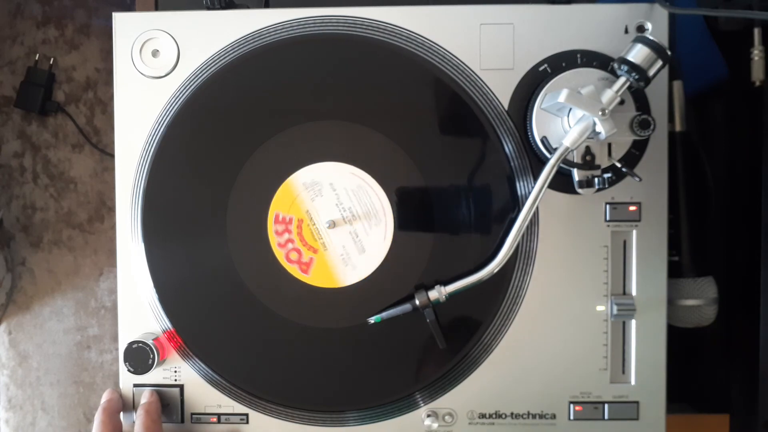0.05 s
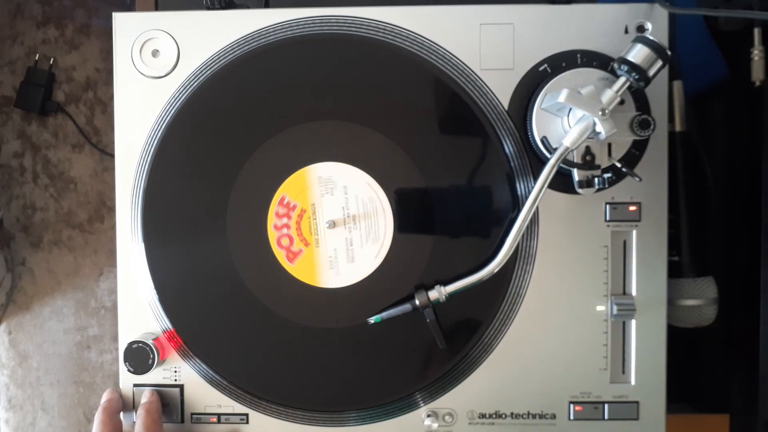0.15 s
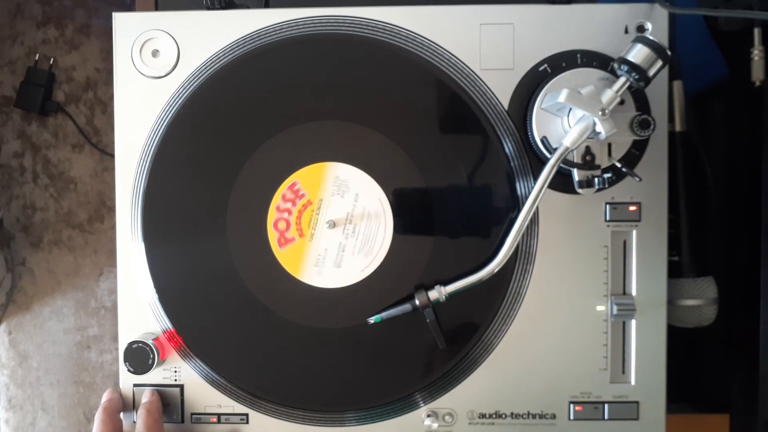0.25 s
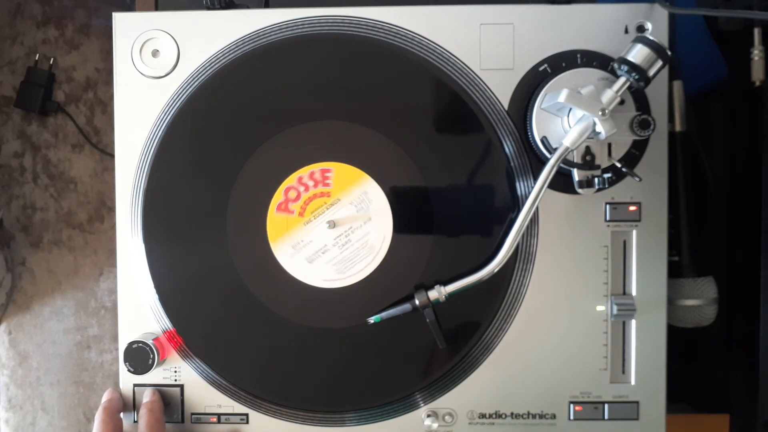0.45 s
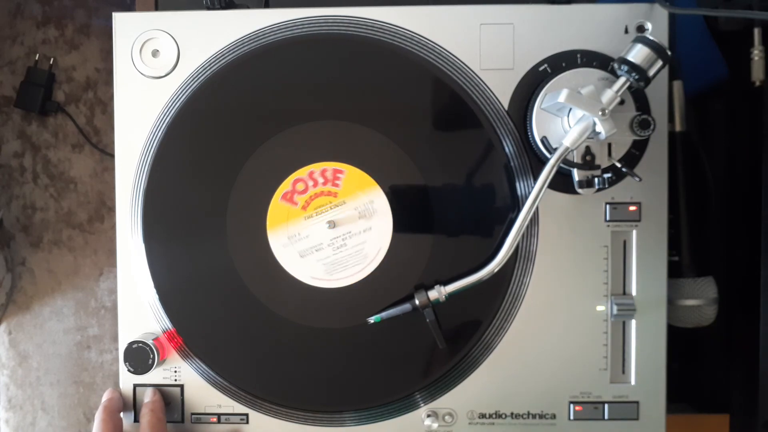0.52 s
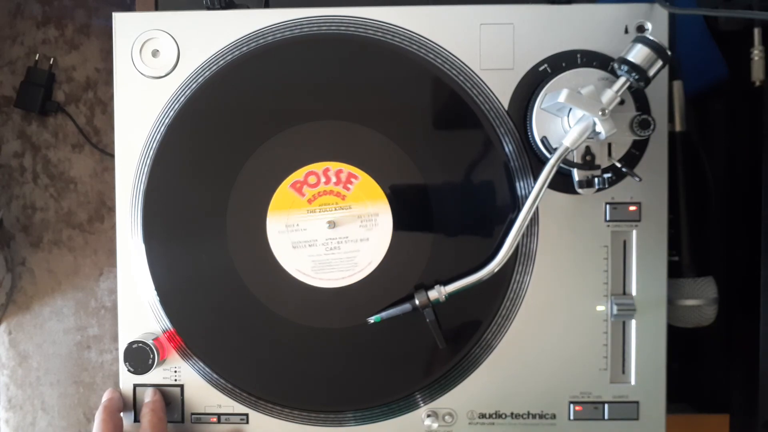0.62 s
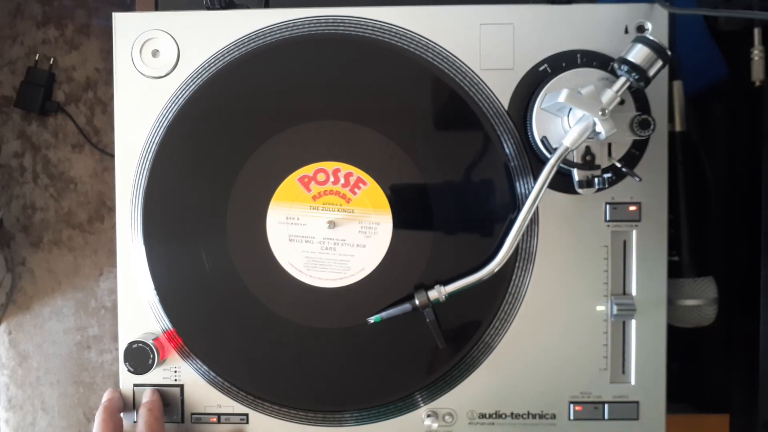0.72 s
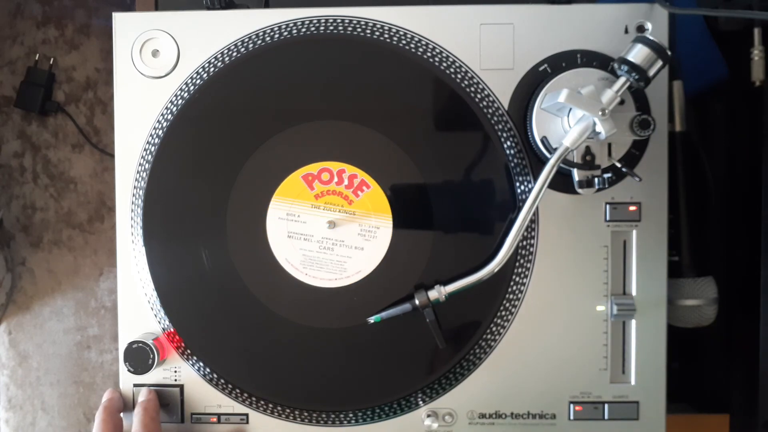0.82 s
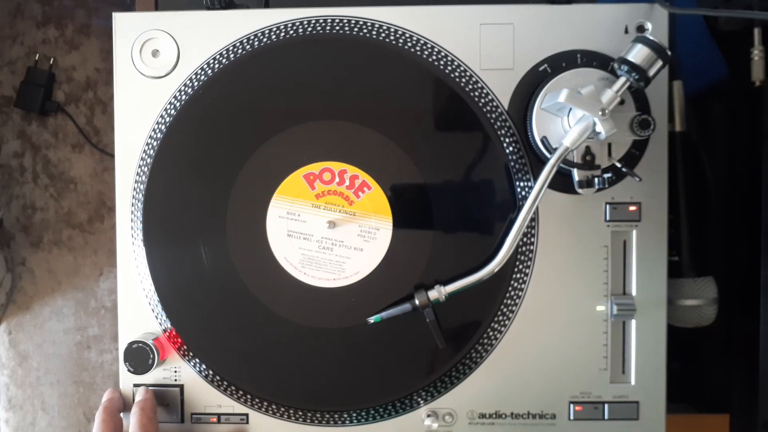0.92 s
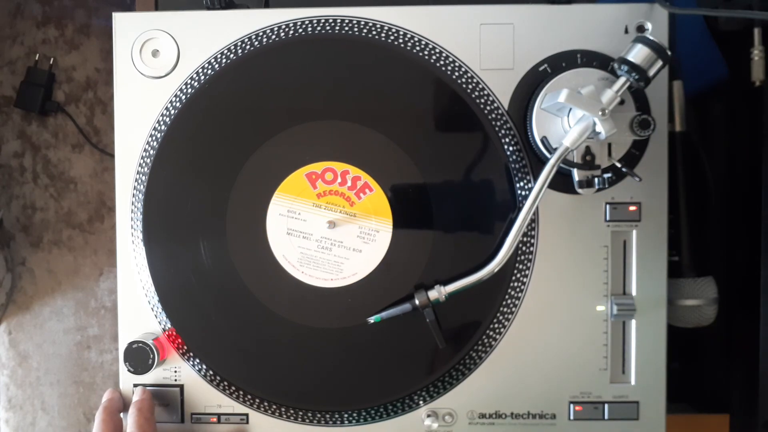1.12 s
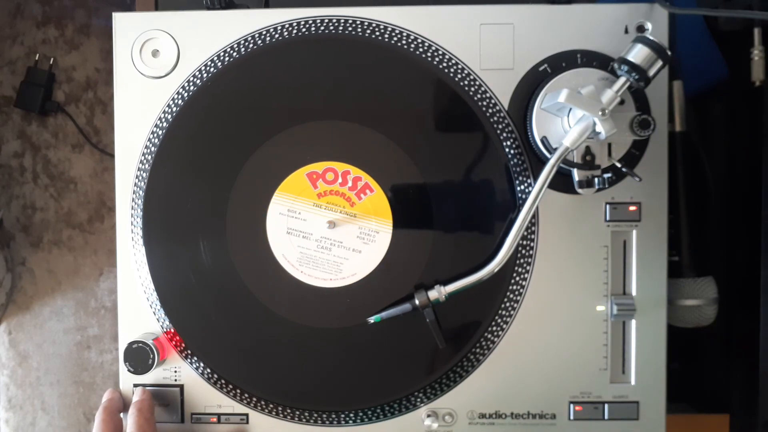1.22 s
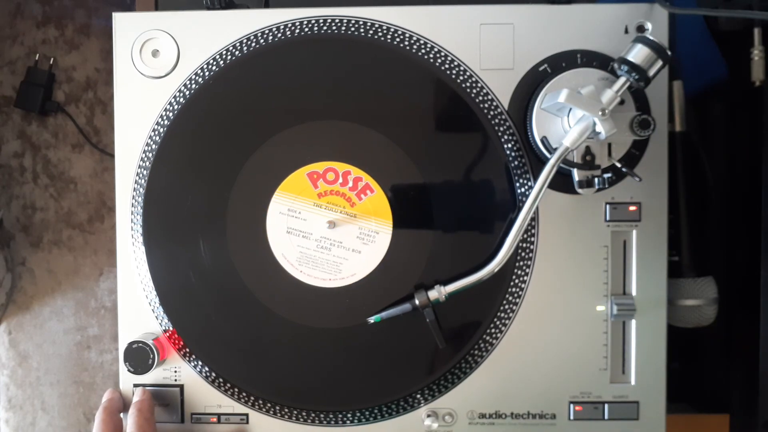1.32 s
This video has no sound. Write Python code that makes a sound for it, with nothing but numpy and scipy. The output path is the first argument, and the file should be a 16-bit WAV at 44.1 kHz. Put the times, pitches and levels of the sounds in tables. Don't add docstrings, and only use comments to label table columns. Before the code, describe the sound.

Vinyl surface noise on a turntable: dense crackle, sharp pops and low bumps while the record brakes, then a soft thud as it stops and a low hum dying over faint hiss, direct from the cartridge, no room.

```python
import sys
import numpy as np
from scipy import signal
from scipy.fft import rfft, irfft
from scipy.io import wavfile
from scipy.ndimage import uniform_filter1d

SR = 44100
rng = np.random.default_rng(int(sys.argv[2]) if len(sys.argv) > 2 else 0)


def log_audio(samples):
    frames = np.atleast_2d(samples).T
    limited = np.clip(frames, -1, 1)
    pcm = np.round(limited * 32767).astype(np.int16)
    wavfile.write(sys.argv[1], SR, pcm)


def decibels_to_gain(level_db):
    exponent = np.asarray(level_db, float) / 20
    return 10 ** exponent


N = 59535
BRAKE_S = 0.8397
SAG_S, JOLT_RISE_S = 0.015, 0.0022


def evened(x):
    return x / np.sqrt(np.mean(x ** 2) + 1e-20)


def curve(points):
    s, value = np.transpose(points)
    return np.interp(np.arange(N) / SR, s, value)


def coloured(spectrum):
    f, db = np.transpose(spectrum)
    hz = np.fft.rfftfreq(N, 1 / SR)
    gain = decibels_to_gain(np.interp(np.log(hz + 1), np.log(f + 1), db))
    return evened(irfft(rfft(rng.standard_normal(N)) * gain, N))


def wander(seconds):
    size = max(int(seconds * SR), 1)
    once = uniform_filter1d(rng.standard_normal(N), size)
    return evened(uniform_filter1d(once, size))


def resonate(x, hz, width_hz):
    turn = np.exp(2j * np.pi * hz * np.arange(len(x)) / SR)
    r = np.exp(-np.pi * width_hz / SR)
    return 2 * (turn * signal.lfilter([1 - r], [1, -r], x / turn + 1e-18)).real


def add(mix, s, sound):
    part = mix[max(round(s * SR), 0):][:len(sound)]
    part += sound[:len(part)]


def hiss():
    # f/Hz, density/dB
    hiss_spectrum = [(130, -32), (220, -1), (327, -28), (1540, -19.5), (1650, -22), (1780, -24),
                     (15100, -29.5), (16300, -46)]
    return decibels_to_gain(-59) * coloured(hiss_spectrum)


def pop(hz, fizz_db, grit):
    blunt, spring_hz = 0.8, 416
    chip_db, chip_span_s = -12, (-0.0025, 0.0006)
    fizz_band_hz, fizz_s, fizz_lead_s, fizz_trim_db = (1500, 8000), 0.0004, 0.0004, -1
    t = (np.arange(len(grit)) - 128) / SR
    chip_at_s = np.interp(np.sin(9 * grit[:4]), (-1, 1), chip_span_s)[:, None]
    chip_size = decibels_to_gain(chip_db) * np.tanh(grit[4:8])
    chips = 1 / (1 + (2 * np.pi * hz * (t - chip_at_s)) ** 2) ** 2
    dip = -1 / (1 + (2 * np.pi * blunt * hz * t) ** 2) ** 2
    dip = dip + chip_size @ chips
    dip = signal.lfilter(*signal.butter(1, spring_hz, "high", fs=SR), dip)
    burst = grit * np.exp(-abs(t + fizz_lead_s) / fizz_s)
    fizz = signal.lfilter(*signal.butter(1, fizz_band_hz, "band", fs=SR), burst)
    return dip / abs(dip).max() + decibels_to_gain(fizz_db + fizz_trim_db) * fizz / abs(fizz).max()


def fine_crackle():
    per_s, spread_db = 1200, 4.5
    hit = rng.random(N) < per_s / SR
    size = hit * decibels_to_gain(spread_db * np.minimum(rng.exponential(1, N), 3))
    sign = np.where(rng.random(N) < 0.7, 1, -1)
    kind = rng.integers(0, 24, N)
    sharp_hz = np.geomspace(830, 5970, num=24)
    fizz_db = rng.uniform(-14, 0, 24)
    out = np.zeros(N)
    for k, hz in enumerate(sharp_hz):
        speck = pop(hz, fizz_db[k], rng.standard_normal(256))
        out += signal.oaconvolve(size * sign * (kind == k), speck)[:N]
    return evened(out)


def scrape():
    # f/Hz, density/dB
    scrape_spectrum = [(180, -41), (300, -32), (433, 1), (528, -1.5), (3350, -15), (3760, -16.5),
                       (16000, -27)]
    flicker_db = 2.5 * wander(0.002) + 1.2 * wander(0.015)
    return evened(coloured(scrape_spectrum) * decibels_to_gain(flicker_db))


def groove():
    # t/s, level/dB
    friction = [(0, -40.5), (.06, -39.5), (.12, -40), (.16, -43), (.21, -40), (.285, -42), (.35, -36.5),
                (.45, -42.5), (.52, -35.5), (.62, -43.5), (.66, -47.5), (.72, -49.5), (.77, -45),
                (.81, -49), (.84, -51), (1.1, -56.5), (1.2, -60.5)]
    still_db = np.interp(np.arange(N) / SR, (BRAKE_S - 0.03, BRAKE_S), (0, -12))
    crackle = decibels_to_gain(-1.5 + still_db) * fine_crackle()
    return decibels_to_gain(curve(friction)) * (crackle + decibels_to_gain(-2.5) * scrape())


def arm():
    # f/Hz, width/Hz, level/dB
    arm_modes = [(62, 25, -6.5), (550, 120, -17), (110, 45, -1.5), (175, 45, -1.5), (260, 70, -4)]
    # t/s, level/dB
    tremble = [(0.0, -30), (0.134, -35), (0.36, -28.5), (0.466, -28.5), (0.646, -37.5), (0.788, -31),
               (0.916, -53.5), (1.056, -55), (1.35, -60)]
    lumpy_db = 4 * wander(0.0061)
    shake = rng.standard_normal(N) * decibels_to_gain(lumpy_db)
    body = np.zeros(N)
    for hz, width_hz, db in arm_modes:
        mode = resonate(resonate(shake, hz, width_hz), hz, width_hz)
        body += decibels_to_gain(db) * evened(mode)
    return decibels_to_gain(curve(tremble)) * evened(body)


def pops():
    # t/s, level/dB, sharpness f/Hz, fizz re level/dB
    pops_early = [(0.0107, -15, 1710.0, -15), (0.016, -23, 1860.0, -7), (0.0293, -21, 1350.0, -8),
                  (0.0338, -14, 1310.0, -10), (0.0646, -21, 1130.0, -15), (0.0667, -21, 960.0, -16),
                  (0.1062, -23, 2280.0, -12), (0.1164, -24, 2110.0, -4), (0.1205, -16, 2170.0, -8),
                  (0.1265, -23, 1220.0, -20), (0.1409, -21, 2490.0, -9), (0.1803, -24, 2090.0, -10),
                  (0.2003, -23, 3830.0, -8), (0.2228, -15, 1550.0, -7), (0.2271, -16, 1280.0, -13),
                  (0.2299, -7, 2140.0, -17), (0.2386, -10, 2320.0, -10), (0.2416, -22, 1650.0, -7),
                  (0.2635, -18, 990.0, -3), (0.2704, -10, 950.0, -19), (0.2732, -12, 1300, -12),
                  (0.3215, -13, 1240.0, -17), (0.3343, -19, 1920.0, -2), (0.3366, -21, 2890.0, -9),
                  (0.3437, -13, 1680.0, -16), (0.3587, -11, 3510.0, -10), (0.3653, -14, 1900.0, -12),
                  (0.3736, -19, 1220.0, -5), (0.3907, -18, 3000.0, -5), (0.3942, -22, 3600.0, -5)]
    # t/s, level/dB, sharpness f/Hz, fizz re level/dB
    pops_late = [(0.4127, -17, 1040.0, -19), (0.4312, -22, 3040.0, -3), (0.4436, -14, 1170.0, -24),
                 (0.4482, -22, 2220.0, -5), (0.4711, -24, 2950.0, -4), (0.4736, -19, 2860.0, -6),
                 (0.4813, -23, 3470.0, -8), (0.4994, -18, 3860.0, -9), (0.5139, -12, 2230.0, -10),
                 (0.5209, -19, 1400.0, -4), (0.5253, -19, 1580.0, -7), (0.5519, -20, 1750.0, -11),
                 (0.5637, -15, 1050.0, -18), (0.5702, -24, 2850.0, -5), (0.5745, -22, 1850.0, -12),
                 (0.581, -18, 2240.0, -6), (0.5973, -14, 3130.0, -6), (0.6032, -20, 1460.0, -9),
                 (0.6346, -23, 1340.0, -12), (0.6467, -6, 1370.0, -20), (0.6501, -24, 1990.0, -14),
                 (0.7062, -26, 1680.0, -16), (0.741, -30, 2790.0, -9), (0.7616, -24, 2300.0, -14),
                 (0.7883, -27, 1810.0, -15), (0.7957, -25, 1110.0, -15), (0.8049, -24, 1220.0, -10),
                 (0.813, -18, 3000.0, -8), (0.8211, -29, 830.0, -18), (1.1601, -44, 870.0, -11)]
    # t/s, level/dB, sharpness f/Hz, fizz re level/dB
    pops_torn = [(.2285, -15, 1700, -12), (.2716, -17, 2000, -8), (.2746, -14, 2600, -10),
                 (.6453, -20, 1800, -14), (.7228, -32, 1500, -16), (.3198, -22, 2500, -2),
                 (.5784, -24, 2500, -4)]
    out = np.zeros(N)
    for s, db, hz, fizz_db in list(pops_early) + list(pops_late) + list(pops_torn):
        speck = pop(hz, fizz_db, rng.standard_normal(256))
        add(out, s - 128 / SR, decibels_to_gain(db + 1) * speck)
    return out


def swing(db, first_hz, last_hz, t60_s, sag_s, rise_s):
    t = np.arange(N) / SR
    turns = np.cumsum(last_hz + (first_hz - last_hz) * np.exp(-t / sag_s)) / SR
    return np.sin(2 * np.pi * turns) * decibels_to_gain(db - 60 * t / t60_s) * np.minimum(t / rise_s, 1)


def plinth_ring():
    # f/Hz, level/dB, t60/s
    plinth_modes = [(61.4, 0, 1.25), (71.2, -10.5, 1.3), (168, -5, .35), (301, -30, 1.2), (555, -27, .4)]
    beat_lag_s, rise_s = 0.047, 0.007
    t = np.arange(N) / SR
    ring = np.zeros(N)
    for hz, db, t60_s in plinth_modes:
        ring += decibels_to_gain(db - 60 * t / t60_s) * np.cos(2 * np.pi * hz * (t - beat_lag_s))
    return ring * np.minimum(t / rise_s, 1)


def jolts():
    # start t/s, level/dB, swing f/Hz, t60/s, plinth shake/dB
    bumps = [(.045, -33, 110, 0.031, -29), (0.237, -13, 112, 0.021, -66), (0.339, -24, 132, 0.067, -49),
             (0.388, -34, 167, 0.099, -45), (0.4427, -19, 177, 0.018, -45), (.484, -16, 173, 0.12, -50),
             (0.544, -11, 134, 0.04, -53), (0.5643, -12.5, 201, 0.097, -50),
             (0.591, -22, 160, 0.058, -19.5), (0.759, -18, 213, 0.035, -47), (.790, -26.5, 144, 0.14, -54),
             (.806, -19, 285.7, 0.15, -34), (0.8202, -15.5, 190, 0.094, -20.5),
             (0.893, -28.5, 188.5, 0.24, -61), (1.082, -44, 188.3, 0.28, -60),
             (1.135, -41.5, 214, 0.057, -65), (1.273, -36.5, 170, 0.033, -49)]
    # start t/s, level/dB, first f/Hz, last f/Hz, t60/s
    scratches = [
        (.2733, -1, 380, 85, .06),
        (.6468, -8.5, 380, 85, .018),
    ]
    scratch_shake_db = (-40, -22.5)
    sag, running_t60_s = 0.12, 0.21
    out = np.zeros(N)
    free = plinth_ring()
    damped = free * decibels_to_gain(-60 * np.arange(N) / SR / running_t60_s)
    for s, db, hz, t60_s, shake_db in bumps:
        add(out, s, swing(db, hz, hz * (1 - sag), t60_s, SAG_S, JOLT_RISE_S))
        add(out, s, decibels_to_gain(shake_db) * damped)
    for (s, db, first_hz, last_hz, t60_s), shake_db in zip(scratches, scratch_shake_db):
        add(out, s, swing(db, first_hz, last_hz, t60_s, sag_s=0.00185, rise_s=0.0007))
        add(out, s, decibels_to_gain(shake_db) * damped)
        add(out, s, swing(db - 27, 558, 558, 0.16, SAG_S, JOLT_RISE_S))
    drop = swing(-11, 150, 62, 0.034, sag_s=0.007, rise_s=0.0015)
    add(out, BRAKE_S, decibels_to_gain(-27.5) * free - drop)
    return out


def scene():
    return (hiss() + groove() + arm() + pops() + jolts())[None]


def roll_off(x):
    return signal.sosfilt(signal.butter(12, 16420, fs=SR, output="sos"), x)


def record(dry):
    low_cut_hz, edge_hz = 36, 15950
    subsonic = signal.butter(2, low_cut_hz, "high", fs=SR, output="sos")
    band_limit = signal.firwin(511, edge_hz, window=("kaiser", 9), fs=SR)
    mix = signal.sosfilt(subsonic, dry)
    mix = signal.oaconvolve(mix, band_limit[None], "same")
    return roll_off(mix)


dry = scene()
out = record(dry)
log_audio(out)
```